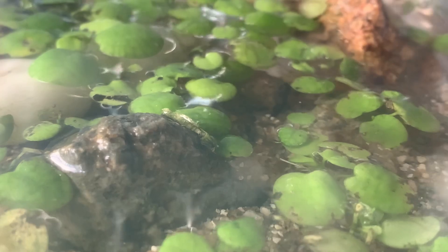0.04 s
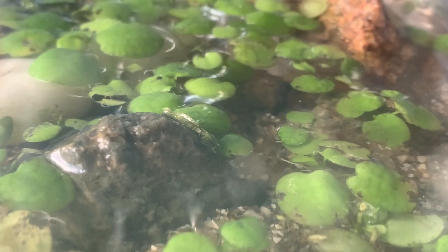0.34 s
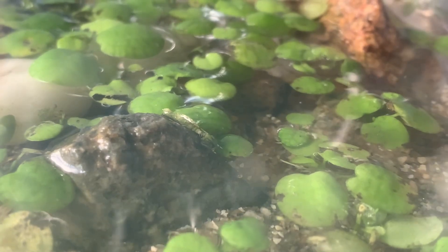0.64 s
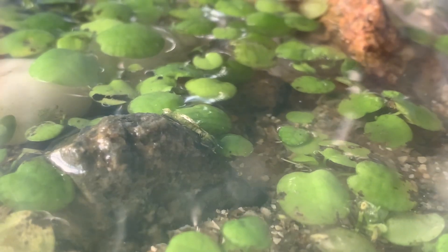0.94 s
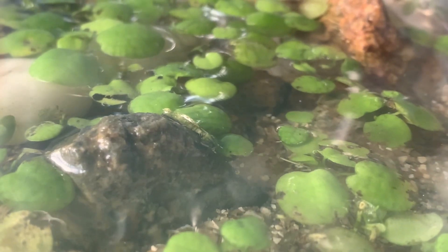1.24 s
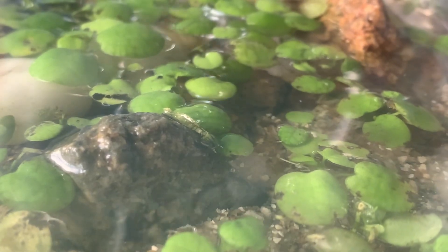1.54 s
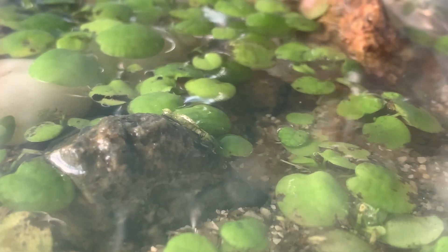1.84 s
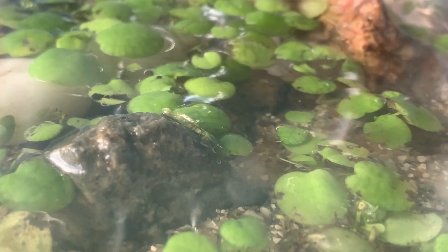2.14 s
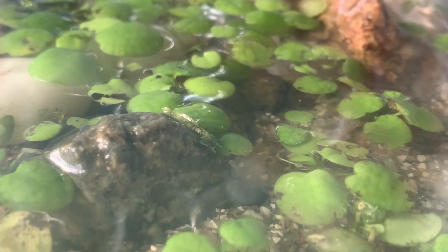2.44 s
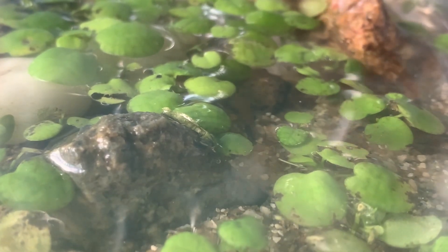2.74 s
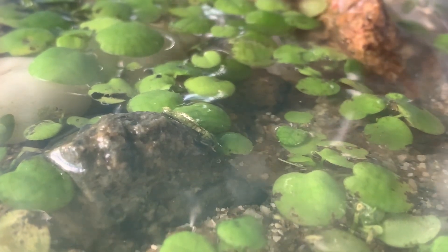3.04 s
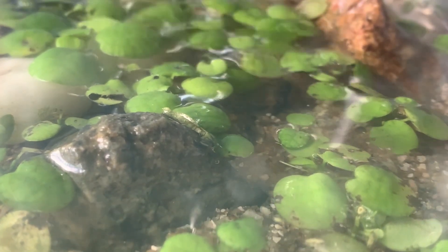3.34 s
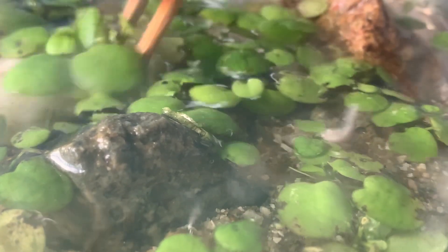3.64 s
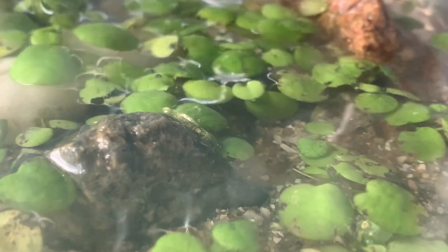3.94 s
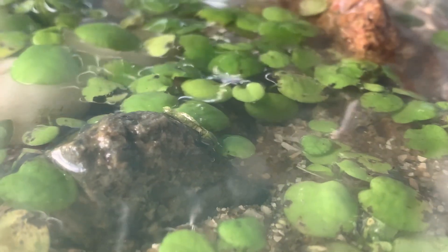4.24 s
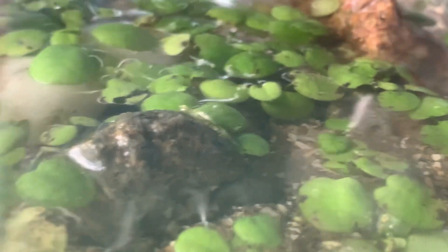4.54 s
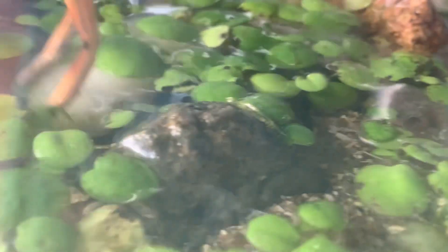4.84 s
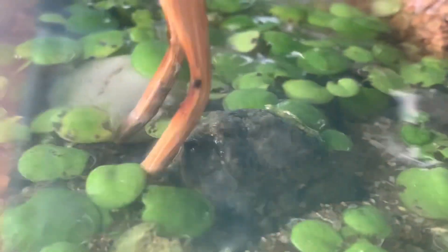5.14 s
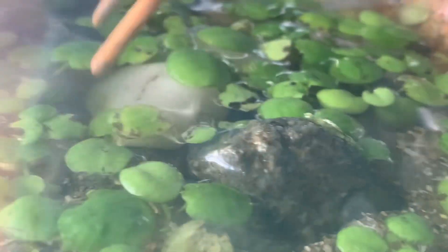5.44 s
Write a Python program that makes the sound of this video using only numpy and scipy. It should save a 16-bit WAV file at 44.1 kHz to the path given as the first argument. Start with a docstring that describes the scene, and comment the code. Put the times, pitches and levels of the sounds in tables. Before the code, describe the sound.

Water trickles steadily into an indoor aquarium, heard from just above the surface, with small plops, gurgles and fine ticks of spray over a low pump hum. About four seconds in, something is moved through the water and floating leaves: two quick runs of sloshing, dull bumps and rubbing against the tank, with a few sharp clicks. The trickle carries on afterwards.

```python
"""Trickling water and the mains hum of a pump, heard from just above an indoor aquarium.
Drops excite the air resonances of the tank, trapped air pockets glug and fine spray ticks.
Late on, something is moved about at the tank: two runs of sloshing, dull bumps and rubbing
that drive its low modes, with wet crackle and a few sharp clicks."""
import sys
import numpy as np
from scipy import signal
from scipy.fft import rfft, irfft
from scipy.io import wavfile

SR = 44100
rng = np.random.default_rng(int(sys.argv[2]) if len(sys.argv) > 2 else 0)


def put_to_file(sound):
    """Save the sound as 16-bit audio at rate SR, in the file named by the first command-line argument."""
    columns = np.atleast_2d(sound).T  # one column per channel
    safe = np.clip(columns, -1, 1)
    whole_steps = np.round(safe * 32767)
    wavfile.write(sys.argv[1], SR, whole_steps.astype(np.int16))


N = 251370
T = np.arange(SR // 3) / SR  # time axis of one small sound

# spectrum of the spray: f/Hz, level/dB
SPRAY_SPECTRUM = [(1500, -97), (4500, -3), (7000, -40), (8300, -1.5), (9700, 6.5), (10250, 15.5),
                  (10600, 0.5), (11100, -2.5), (12200, -0.5), (13100, 5.5), (13500, 14.5), (14300, -6),
                  (15600, -1), (16200, -55)]
# low modes of the tank: f/Hz, level/dB, t60/s
TANK_MODES = [(97, -18, 0.18), (111, -2, 0.2), (140.5, -3.5, 0.26), (195.4, -2.5, 0.085), (256, 0, 0.15),
              (283, -10, 0.049), (435, 0.5, 0.079), (523, -9, 0.058), (564, 0.5, 0.025), (684, -6, 0.028),
              (927, -5.5, 0.028)]


def amp(db):
    """Decibels to amplitude ratio."""
    return 10 ** (np.asarray(db) / 20)


def curve_at(points, hz):
    """Linear interpolation on a log-frequency axis."""
    f, value = np.transpose(points)
    return np.interp(np.log(hz + 1), np.log(f + 1), value)


def add(mix, s, sound):
    """Superposition: a sound joins the mix at time s."""
    part = mix[:, max(round(s * SR), 0):][:, :sound.shape[1]]
    part += sound[:, :part.shape[1]]


def decay(t60, rise):
    """Exponential decay, 60 dB in t60 seconds, with a rounded onset."""
    return np.exp(-np.log(1000) * T / t60) * (1 - np.exp(-T / rise))


def burst(t60, rise, channels=()):
    """White noise under an exponential decay."""
    return rng.standard_normal((*channels, len(T))) * decay(t60, rise)


def peaked(x):
    """Normalisation to a peak of 1."""
    return x / abs(x).max()


def colour(x, points, peaks=()):
    """Minimum-phase filter: a smooth spectrum plus resonances (f/Hz, width/Hz, lift/dB)."""
    size = 8192
    hz = abs(np.fft.fftfreq(size, 1 / SR))
    resonances = sum(lift / (1 + (2 * (hz - f) / width) ** 2) for f, width, lift in peaks)
    log_gain = np.log(amp(curve_at(points, hz) + resonances))
    taps = np.fft.ifft(np.exp(np.conj(signal.hilbert(log_gain)))).real[:size // 2]
    return np.apply_along_axis(lambda v: signal.fftconvolve(v, taps)[:len(v)], -1, x)


def place(x, lag_ms, pan_db):
    """Time and level differences locate a point source; positive values put it to the left."""
    hz = np.fft.rfftfreq(len(x), 1 / SR)
    delayed = irfft(rfft(x) * np.exp(-2j * np.pi * hz * lag_ms / 1000), len(x))
    return np.array([x * amp(pan_db / 2), delayed * amp(-pan_db / 2)])


def diffuse(pair, pan_db):
    """A diffuse field is coherent between the ears in the bass and nearly incoherent in the treble."""
    # left-right likeness: f/Hz, coherence
    likeness = [(100, 0.92), (350, 0.32), (700, 0.021), (1600, 0.35), (3000, 0.018), (6000, 0.022)]
    left, unrelated = rfft(pair)
    coherence = np.clip(curve_at(likeness, np.fft.rfftfreq(pair.shape[1], 1 / SR)), 0, 1)
    right = coherence * left + np.sqrt(1 - coherence ** 2) * unrelated
    return irfft(np.array([left * amp(pan_db / 2), right * amp(-pan_db / 2)]), pair.shape[1])


def patter(per_s, spread_db, t60, count):
    """Shot noise: random impacts at `count` spots, each with its own echoes; 0 dB per Hz."""
    out = np.zeros((2, N))
    for _ in range(count):
        hits = rng.random(N) < per_s / count / SR
        sizes = amp(spread_db * np.minimum(rng.exponential(1, N), 3))
        echoes = burst(t60, .0016, channels=[2])
        out += signal.fftconvolve((hits * sizes)[None], echoes, axes=1)[:, :N]
    return out / out.std() * np.sqrt(SR / 2)


def bubble(hz, t60, glide, wet):
    """An air pocket is a damped oscillator of rising pitch; echoes between glass and water roughen it."""
    ring = np.sin(2 * np.pi * hz * (T + glide * T * (T / 2 - .01))) * decay(t60, .0057)
    echoes = signal.fftconvolve(ring, burst(.11, .002))[:len(T)]
    return peaked(peaked(ring) + wet * peaked(echoes))


def mode_response(force, hz, t60):
    """Forced vibration: the force convolved with the damped sine of one mode; peak 1."""
    ring = np.sin(2 * np.pi * hz * T) * decay(t60, .00072)
    return peaked(signal.fftconvolve(force, ring)[:len(force)])


def pump(mains_hz=60.06):
    """Periodic drive: the pump hums at harmonics of the mains, the third strongest, over a low rumble."""
    # hum: harmonic number, left level/dB, right level/dB
    harmonics = [(1, -57, -54.5), (2, -58.5, -60.5), (3, -46, -47.5), (5, -56, -56), (6, -61, -104),
                 (7, -74.5, -77.5), (8, -68, -100), (9, -70, -81), (11, -75, -64.5)]
    # rumble of pump and room: f/Hz, level/dB per Hz
    rumble_spectrum = [(15, -130), (28, -89.5), (44, -80.5), (75, -72), (100, -83), (155, -77.5),
                       (215, -86.5), (280, -78.5), (400, -89), (600, -95.5), (1500, -86), (4000, -110),
                       (16000, -130)]
    t = np.arange(N) / SR - np.array([[0], [.0004]])  # the hum arrives on the left first
    hum = sum(amp([[left], [right]]) * np.sqrt(2) * np.sin(2 * np.pi * k * mains_hz * t)
              for k, left, right in harmonics)
    rumble = colour(rng.standard_normal((2, N)) * np.sqrt(SR / 2), rumble_spectrum)
    return hum + diffuse(rumble, pan_db=3)


def trickle():
    """Cavity resonance: the air space of the tank filters countless small drops."""
    # running water: f/Hz, level/dB per Hz
    flow_spectrum = [(200, -104), (450, -89.5), (850, -86), (1300, -91), (1900, -85.5), (2400, -87),
                     (2850, -90.5), (3050, -97), (3600, -96), (4400, -104), (6800, -105), (9000, -120),
                     (16000, -135)]
    # air resonances: f/Hz, width/Hz, lift/dB
    air_modes = [(701, 34, 7), (738, 35, 10), (1031.6, 49, 9.5), (1344, 30, 15), (1474, 22, 10),
                 (1678, 48, 14), (1895, 57, 10.5), (2120, 170, 4.5), (2460, 18, 9)]
    impacts = patter(per_s=550, spread_db=2.5, t60=.089, count=24)
    return diffuse(colour(impacts, flow_spectrum, air_modes), pan_db=1.5)


def crackle(centre_s=4.65, width_s=.6, level_db=-102):
    """Modulated shot noise: wet floating leaves crackle in one slow swell as the water is stirred."""
    # crackle: f/Hz, level/dB
    spectrum = [(1000, -24), (2500, 4.5), (4700, -0.5), (7000, 0.5), (8700, -40), (10300, 2.5), (13000, -6),
                (16000, -5)]
    stirring = np.exp(-((np.arange(N) / SR - centre_s) / width_s) ** 2)
    grains = patter(per_s=70, spread_db=3.5, t60=.04, count=4)
    return amp(level_db) * stirring * diffuse(colour(grains, spectrum), pan_db=-5)


def tick(hz):
    """A tiny bubble bursts: a transient with a high resonance and a short tail."""
    snap = rng.standard_normal((1, len(T))) * (decay(.014, .0003) + .45 * decay(.19, .0005))
    return peaked(colour(snap, SPRAY_SPECTRUM, [(hz, 2000, 15)]))


def spray():
    """Ticks and a fine sizzle arrive from the right, directly and by reflection off the glass."""
    # loudest ticks: t/s, tick level/dB, fizz level/dB (each on its own relative scale), f/Hz
    loud = [(0.0288, -47.5, -78, 14700), (0.0775, -49, -74, 12200), (0.181, -53, -60, 10300),
            (0.2313, -50, -67.5, 12200), (0.2927, -57, -80, 10100), (0.414, -49, -87, 12000),
            (0.4908, -51.5, -89, 12000), (0.6045, -62, -88, 10300), (0.6409, -52, -92, 14400),
            (0.6684, -55.5, -89, 10500), (0.7364, -48.5, -76, 11100), (0.8097, -47, -82, 14900),
            (0.8844, -57, -92, 10700), (0.9552, -57, -93, 10200), (1.0241, -61, -73, 10800),
            (1.1748, -42, -84, 14200), (1.228, -54, -71, 10400), (1.344, -48, -75, 14900),
            (1.3927, -52, -80, 10700), (1.6317, -56, -90, 10200), (1.7529, -48.5, -80, 11960),
            (1.958, -45, -77, 14900), (2.109, -42, -72, 14500), (2.3067, -55, -86, 10500),
            (2.3451, -49.5, -76, 11500), (2.6908, -53, -73, 10500), (2.7515, -44.5, -70, 10900),
            (2.8409, -46.5, -87, 14300), (2.8983, -53, -78, 10400), (3.021, -52, -71.5, 10900),
            (3.2602, -41.5, -65.5, 12500), (3.464, -55.5, -86, 10300), (3.5129, -53.5, -75, 10100),
            (3.6765, -52.5, -72, 10600), (3.7464, -46, -64.5, 10700), (3.92, -49, -85, 11400),
            (3.955, -47, -72, 11400), (4.124, -44, -64, 14300), (4.18, -50, -67, 11900),
            (4.255, -46.5, -68, 11000), (4.556, -54, -69.5, 12000), (4.7536, -46, -81, 15000),
            (4.825, -46.5, -71, 10900), (4.948, -46.5, -73, 11000), (5.0083, -48.5, -72, 10600),
            (5.2059, -59, -65, 12100), (5.2757, -61, -74, 14800), (5.3421, -58, -74, 12600),
            (5.589, -63, -75, 12500)]
    fizz_spectrum = [(2500, -36), (5000, -30.5), (6900, -16), (8500, -16.5), (12000, -35.5)]
    sizzle = patter(per_s=60, spread_db=3, t60=.11, count=4)[:1]
    out = amp(-112) * colour(sizzle, SPRAY_SPECTRUM)
    faint = [(when * N / SR, -55 - 12 * weak_tick, -74 - 12 * weak_fizz, 9500 + 5500 * pitch)
             for when, weak_tick, weak_fizz, pitch in rng.random((50, 4))]
    for s, tick_db, fizz_db, hz in [*loud, *faint]:
        fizz = colour(burst(.07, .0003, channels=[1]), fizz_spectrum)
        add(out, s, amp(tick_db + 5) * tick(hz))
        add(out, s, amp(fizz_db + 24.5) * peaked(fizz))
    add(out, .0044, .4 * out)  # the reflection
    return place(out[0], lag_ms=-.18, pan_db=0)


def droplets():
    """Bubble resonance: small bubbles ring all over the surface; the higher, the fainter."""
    out = np.zeros((2, N))
    events = rng.uniform([0, -52, 0, -3, -.25], [N / SR, -44, 1.05, 6, .1], size=(150, 5))
    for s, db, octaves, pan_db, lag_ms in events:
        plink = bubble(1250 * 2 ** octaves, t60=.009, glide=1.2, wet=.4)
        add(out, s, amp(db - 4 * octaves ** 2) * place(plink, lag_ms, pan_db))
    return out


def drops():
    """Impact noise, then bubble resonance: a drop smacks the surface, spatters and plinks."""
    # drops: t/s, relative splash level/dB, plink level/dB, f/Hz
    events = [(0.18, -36.5, -46, 6430), (0.489, -66, -55, 3980), (0.669, -57, -54, 3420),
              (1.025, -55, -47, 2800), (1.482, -47, -54, 2960), (1.6756, -39, -42, 2680),
              (1.974, -50, -52, 4160), (2.232, -48, -45, 2760), (2.4343, -46, -60, 3100),
              (2.631, -48, -52, 3684), (2.754, -50, -57, 4000), (2.785, -47, -49, 3270),
              (2.923, -47.5, -60, 3950), (3.0754, -43, -65, 3440), (3.674, -45, -57, 2750),
              (3.747, -46, -57, 6400), (4.25, -40, -64, 2750), (5.04, -43, -49, 2440),
              (5.178, -42, -52, 2610)]
    # splash: f/Hz, level/dB
    spectrum = [(500, 2), (1500, -6), (2700, 6.5), (4500, 1), (7000, 0.5), (9000, -22)]
    out = np.zeros((2, N))
    for s, splash_db, plink_db, hz in events:
        smack = place(burst(.014, .0002), lag_ms=-.19, pan_db=-2)
        spatter = diffuse(burst(.22, .00093, channels=[2]), pan_db=-4)
        splash = colour(smack + amp(-3) * spatter, spectrum, [(hz, .25 * hz, 7)])
        add(out, s, amp(splash_db + 1) * peaked(splash))
        plink = bubble(hz, t60=.014, glide=2, wet=.45)
        add(out, s, amp(plink_db) * place(plink, lag_ms=-.06, pan_db=-8))
    return out


def glugs(faint_db=-48.5, spread_db=21):
    """Large air pockets resonate low, to the right; faint ones come at random between the loud."""
    # loudest air pockets: t/s, level/dB, f/Hz, t60/s
    loud = [(0.266, -42, 686, 0.042), (0.442, -42.5, 675, 0.045), (1.243, -36.5, 690, 0.04),
            (1.263, -36.5, 1190, 0.05), (1.266, -37, 670, 0.037), (2.294, -44, 705, 0.06),
            (2.5, -42.5, 724, 0.043), (2.586, -45, 670, 0.089), (2.668, -40.5, 703, 0.054),
            (2.817, -37.5, 671, 0.12), (3.679, -44, 670, 0.14), (3.723, -41.5, 680, 0.051),
            (4.553, -43, 686, 0.029), (4.611, -44, 710, 0.043), (4.682, -37, 694, .045),
            (4.722, -40, 685, 0.048), (4.756, -44, 706, 0.048), (5.044, -44, 666, 0.16),
            (5.136, -42.5, 723, 0.035)]
    out = np.zeros((2, N))
    faint = [(s, faint_db - spread_db * weak, hz, .07)
             for s, weak, hz in rng.uniform([0, 0, 640], [N / SR, 1, 770], size=(75, 3))]
    for s, db, hz, t60 in [*loud, *faint]:
        plop = bubble(hz, t60, glide=.5, wet=.3)
        add(out, s, amp(db) * place(plop, lag_ms=-.23, pan_db=-5))
    return out


def pops():
    """Transient excitation: a large drop's bubble and splash set the air space ringing roughly."""
    # pops: t/s, relative level/dB, f/Hz, left minus right/dB
    events = [(0.0625, -39.5, 1710, -2), (0.1273, -38.5, 1660, -2), (0.263, -48, 1930, 1.0),
              (0.382, -38.5, 1670, -2), (0.444, -38.5, 1680, -2), (0.7713, -38, 1720, 0),
              (0.8255, -43, 2120, 5), (1.0275, -39, 1650, 1.0), (1.264, -41, 1920, -1),
              (1.356, -36.5, 1677, -2), (1.3807, -49, 1655, 3), (1.709, -37, 1686, -1),
              (2.2003, -39, 1680, 1.0), (2.4339, -48, 1646, -6), (2.4981, -40, 1687, 1.0),
              (2.862, -41, 1675, 1.5), (3.1982, -42, 1764, -3), (3.4026, -40, 1690, -0.5),
              (3.677, -35.5, 1670, -2), (4.1502, -40, 1630, 2.5), (4.2505, -34.5, 1657, 2.0),
              (4.5286, -39.5, 1676, -3), (4.6794, -42, 1694, 1.0), (4.988, -45, 1870, -2),
              (5.4234, -38, 1695, -6)]
    # splash in a pop: f/Hz, level/dB
    spectrum = [(500, -29.5), (1300, -12.5), (1700, -4), (2100, 1.5), (2700, -10.5), (5000, -31.5)]
    out = np.zeros((2, N))
    for s, db, hz, pan_db in events:
        splash = peaked(colour(burst(.08, .004), spectrum, [(hz, 120, 16), (1910, 130, 7)]))
        pop = peaked(splash + 1.1 * bubble(hz, t60=.034, glide=.6, wet=.4))
        add(out, s - .001, amp(db + .5) * place(pop, lag_ms=-.1, pan_db=pan_db))
    return out


def rubs(attack_s=.011, release_s=.05):
    """Friction is a sustained random force: something dragged along the tank drives its low modes."""
    # strokes: t/s, duration/s, level/dB
    strokes = [(4.005, 0.13, -50), (4.294, 0.191, -44), (4.778, 0.029, -40.5), (4.825, 0.12, -36),
               (4.994, 0.136, -40.5)]
    # rubbing: f/Hz, level/dB
    spectrum = [(70, -14.5), (105, -4), (160, 1.5), (257, -11), (431, -18.5), (900, -22)]
    t, out = np.arange(N) / SR, np.zeros(N)
    friction = rng.standard_normal(N)
    modes = sum(amp(db) * mode_response(friction, hz, t60) for hz, db, t60 in TANK_MODES)
    rumble = colour(modes, spectrum)
    for start, length, db in strokes:
        stroke = np.clip(np.minimum((t - start) / attack_s, 1 + (start + length - t) / release_s), 0, 1)
        rms = np.sqrt(np.average(rumble ** 2, weights=stroke ** 2))
        out += amp(db) * stroke * rumble / rms
    return place(out, lag_ms=.39, pan_db=4.5)


def bumps(scatter=.038):
    """Modal vibration: scuffing blows ring the tank on the left; a harder blow favours higher modes."""
    # blows: t/s, relative level/dB, hardness as tilt/(dB per octave)
    blows = [(4.1, -35.5, -1.5), (4.192, -40, 2.5), (4.265, -35, 2), (4.344, -42.5, 6.5), (4.359, -36.5, 6),
             (4.401, -38, 7), (4.453, -40.5, 6), (4.835, -32.5, 1.5), (4.95, -33, 0.5), (5.01, -43, 4),
             (5.113, -46.5, -14)]
    # force of a blow: f/Hz, level/dB
    blow_spectrum = [(140, -11), (257, 1), (431, -8.5)]
    # scrape in a bump: f/Hz, level/dB
    scrape_spectrum = [(200, -15), (600, -3.5), (1000, -3.5), (2200, -8.5), (3200, -20.5), (7000, -27)]
    out = np.zeros((2, N))
    for s, strength_db, tilt_db in blows:
        bump = np.zeros(len(T))
        for hz, db, t60 in TANK_MODES:
            force = burst(.083, .0017)
            shifted_hz = hz * (1 + scatter * rng.uniform(-1, 1))  # moving water shifts the modes
            gain = amp(db + curve_at(blow_spectrum, hz) + tilt_db * np.log2(hz / 257))
            bump += gain * mode_response(force, shifted_hz, t60)
        scrape = peaked(colour(burst(.09, .003), scrape_spectrum))
        bump += amp(-2.5 + 1.05 * tilt_db) * scrape
        add(out, s - .002, amp(strength_db) * place(bump, lag_ms=.245, pan_db=5))
    return signal.sosfilt(signal.butter(3, 75, "high", fs=SR, output="sos"), out)


def slosh(low_hz=245, high_hz=792, spread_db=6.5, rise_db=1):
    """Air entrainment: pushed water folds over into crowds of short, low bubbles and a few big gulps."""
    # washes: t/s, duration/s, mean bubble level/dB at the start
    washes = [(2.936, 0.042, -58), (3.262, 0.073, -49), (4.106, .04, -55), (4.176, 0.052, -48),
              (4.253, 0.051, -40.5), (4.341, 0.091, -38.5), (4.823, 0.063, -53), (4.934, 0.1, -45),
              (5.034, .1, -56)]
    # loudest gulps: t/s, level/dB, f/Hz
    gulps = [(4.101, -30, 420), (4.266, -38.5, 233), (4.346, -29.5, 516), (4.357, -26, 262),
             (4.4, -29.5, 633), (4.414, -33, 257), (4.452, -33.5, 676), (4.823, -34, 465),
             (4.845, -44, 594), (4.862, -40, 254), (4.954, -34.5, 414), (4.978, -31.5, 252),
             (5.012, -42, 514)]
    out = np.zeros((2, N))
    for start, length, db in washes:
        for when, pitch, weak in rng.random((36, 3)):
            pocket = bubble(low_hz * (high_hz / low_hz) ** pitch, t60=.012, glide=1.5, wet=.25)
            gain = amp(db - spread_db * (weak - .5) + rise_db * when)
            add(out, start + when * length, gain * place(pocket, lag_ms=.41, pan_db=1.5))
    for s, db, hz in gulps:
        gulp = bubble(hz, t60=18 / hz, glide=.9, wet=.37)  # larger pockets ring longer
        add(out, s, amp(db) * place(gulp, lag_ms=.36, pan_db=.5))
    return out


def clicks():
    """Brief impulses have broad spectra: each close, dry click is a snap, a crack and a hollow knock."""
    # clicks: t/s, snap level/dB, crack level/dB, knock level/dB, knock f/Hz
    events = [(4.347, -25, -38, -25, 2060), (4.383, -31, -40, -44, 1900), (4.399, -31, -30, -34, 2850),
              (4.4546, -19.5, -15, -35, 1800), (4.4625, -17, -13, -27.5, 1800),
              (4.556, -37, -44, -44, 2000), (4.837, -44, -40, -43, 2290), (4.848, -35, -33, -42, 1970)]
    # spectra of the three parts: f/Hz, level/dB
    snap_spectrum = [(6000, -12.5), (8800, -7), (9700, 1), (10350, 14), (11000, -7), (12000, -5),
                     (14000, 3), (16000, -18.5)]
    crack_spectrum = [(600, -10), (1500, -4), (2500, -1), (3400, 10.5), (4500, -11), (5400, -11), (6400, 4),
                      (7400, 9), (8600, 1), (10300, 3), (12000, -18), (14000, -21)]
    knock_spectrum = [(300, -19), (700, 0), (1100, -1.5), (2200, 0.5), (3200, -7.5), (6000, -13.5)]
    sharp, hollow = np.zeros((2, 1, N))
    crack = peaked(colour(signal.unit_impulse((1, len(T))), crack_spectrum))
    for s, snap_db, crack_db, knock_db, hz in events:
        grit = burst(.006, .0003, channels=[1])
        knock = burst(.024, .0004, channels=[1])
        add(sharp, s - .0004, amp(snap_db) * peaked(colour(grit, snap_spectrum)))
        add(sharp, s + .0003, amp(crack_db) * (crack + .35 * peaked(colour(grit, crack_spectrum))))
        add(hollow, s, amp(knock_db) * peaked(colour(knock, knock_spectrum, [(hz, 600, 9)])))
    return place(sharp[0], lag_ms=-.18, pan_db=0) + place(hollow[0], lag_ms=.05, pan_db=3)


def scene():
    """Superposition of the pump, the falling water and the movement at the tank."""
    ongoing = pump() + trickle() + glugs() + pops() + drops() + droplets() + spray()
    movement = crackle() + clicks() + bumps() + slosh() + rubs()
    return ongoing + movement


def record(dry):
    """Band limiting: a linear-phase low-pass at 16.2 kHz."""
    taps = signal.firwin(511, 16200, window=("kaiser", 9), fs=SR)
    return signal.oaconvolve(dry, taps[None], "same")


dry = scene()
out = record(dry)
put_to_file(out)
```